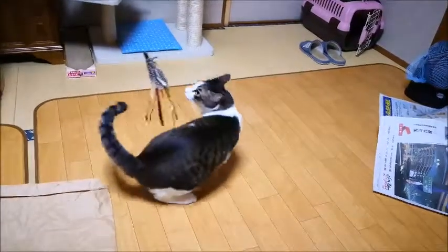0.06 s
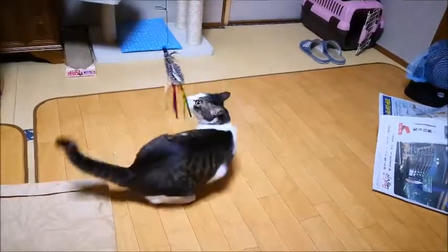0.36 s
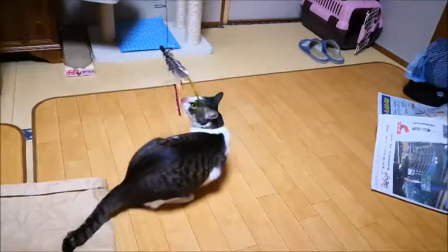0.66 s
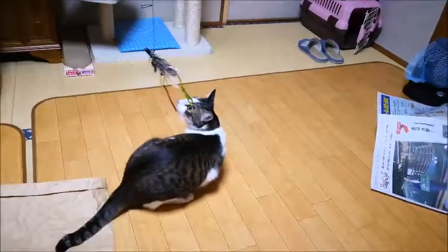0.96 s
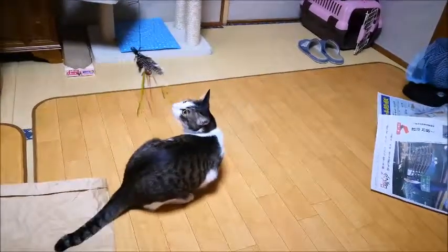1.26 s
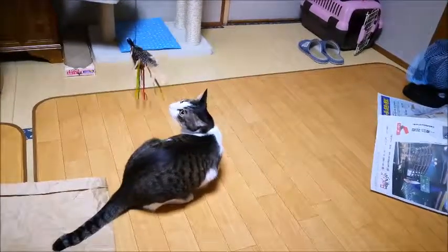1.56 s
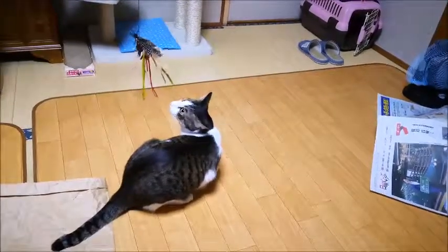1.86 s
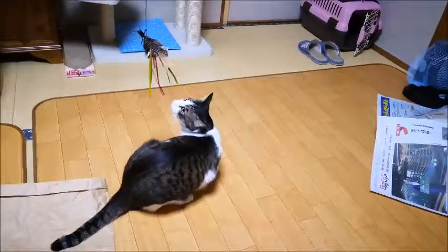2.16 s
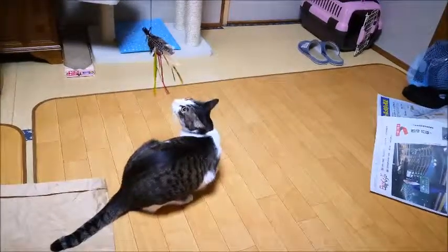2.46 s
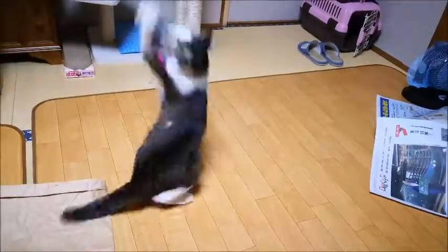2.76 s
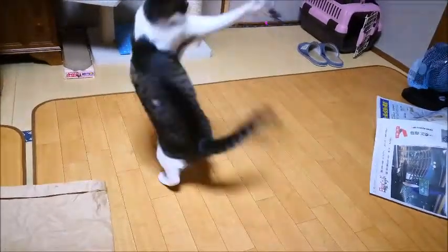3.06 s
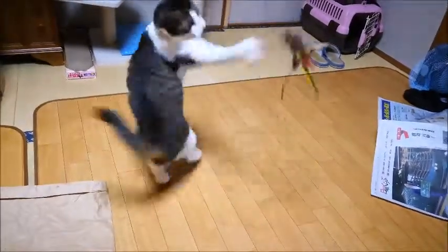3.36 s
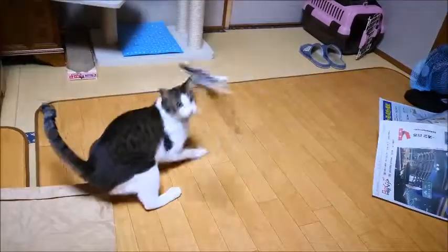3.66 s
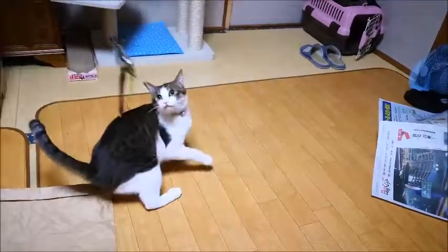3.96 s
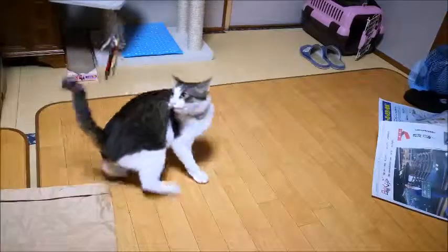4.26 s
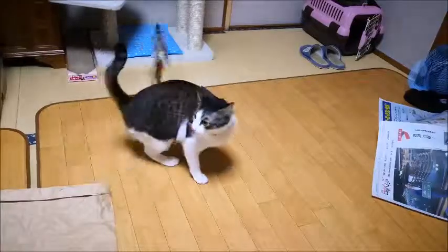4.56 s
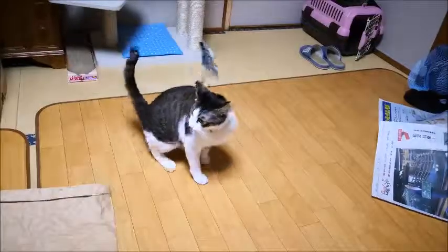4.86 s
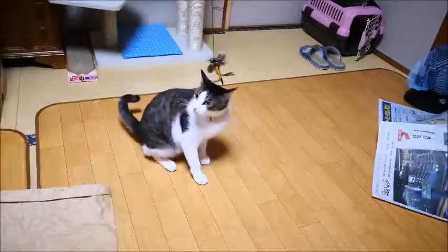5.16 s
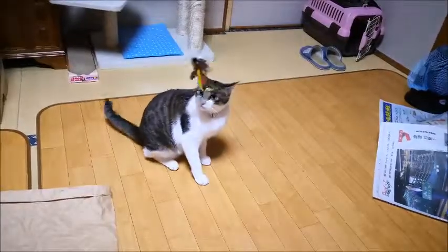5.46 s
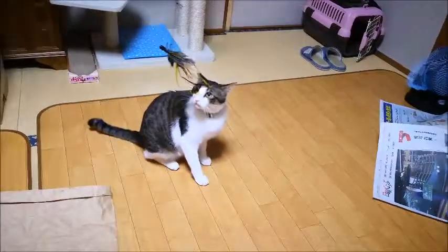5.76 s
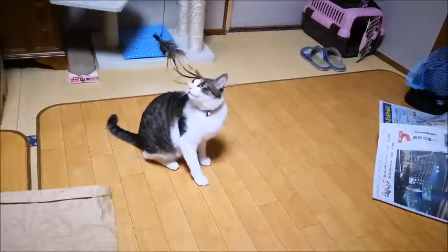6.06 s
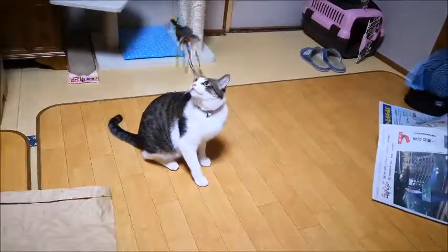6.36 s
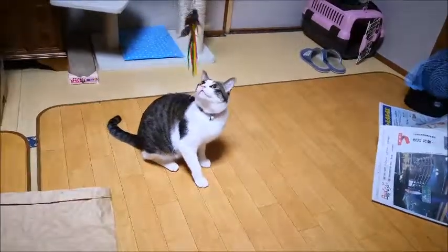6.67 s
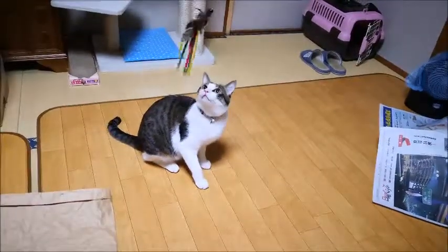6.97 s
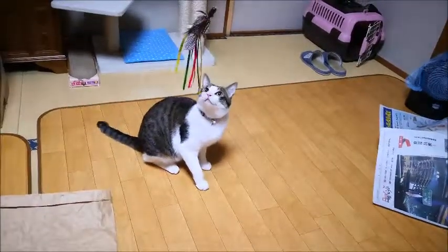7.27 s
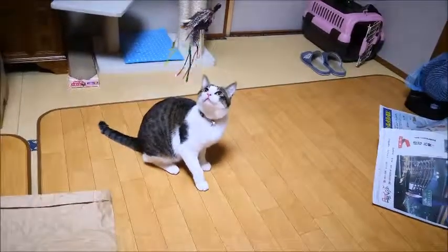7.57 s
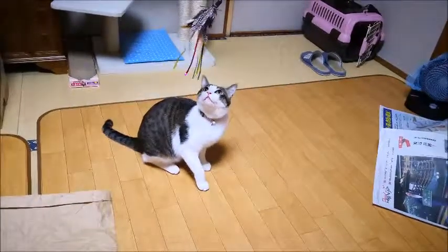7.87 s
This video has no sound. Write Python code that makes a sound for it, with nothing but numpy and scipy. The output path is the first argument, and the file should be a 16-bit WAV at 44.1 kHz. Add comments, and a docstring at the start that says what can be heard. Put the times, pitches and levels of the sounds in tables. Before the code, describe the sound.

Over a soft fan hiss, a cat bats a feather toy, jingling its small bell, and lands with a thump on wooden boards.

```python
"""A tiny bell jingles, feathers rustle and paws thud as a cat plays with a wand toy in a small room.
The cat rears up and swipes: feathers and streamers brush together, and each jolt throws the bell's
pellet against its shell. Then the cat drops on to the wooden floor, where its weight booms in the
boards, its pads knock and its claws scuff. An appliance fan hums and hisses softly all the while."""
import sys
import numpy as np
from scipy import signal
from scipy.fft import rfft, irfft
from scipy.io import wavfile

SR = 44100
rng = np.random.default_rng(int(sys.argv[2]) if len(sys.argv) > 2 else 0)


def pcm_store(signal):
    """Save signal as 16-bit PCM."""
    levels = np.round(np.clip(np.atleast_2d(signal), -1, 1) * 32767)
    wavfile.write(sys.argv[1], SR, levels.astype(np.int16).T)


N = 352800  # 8 seconds
ROOM_T60_S = 0.32  # a "t60" or fade time is the seconds a sound takes to fall by 60 dB


def from_db(db):
    """Turn decibels into a number to multiply by."""
    return 10 ** (np.asarray(db) / 20)


def rms(x):
    """The average strength of a signal (root mean square)."""
    return np.sqrt(np.mean(x ** 2) + 1e-24)


def at_hz(points, hz):
    """Read between the rows of a table, giving each octave equal room."""
    f, value = np.transpose(points)
    return np.interp(np.log(hz + 1e-3), np.log(f), value)


def drift(rate):
    """A wandering line that heads for a new random value `rate` times a second."""
    knots = rng.standard_normal(int(rate * N / SR) + 2)
    return np.interp(np.arange(N) * rate / SR, np.arange(len(knots)), knots)


def clicks(times, db):
    """One sharp click for each contact."""
    out = np.zeros(N)
    np.add.at(out, np.round(np.asarray(times) * SR).astype(int), from_db(db))
    return out


def ring(drive, hz, t60):
    """Each click in `drive` starts a fading tone as strong as itself."""
    decay = from_db(-60 / (t60 * SR))
    step = 2 * np.pi * hz / SR
    return signal.lfilter([0, np.sin(step)], [1, -2 * decay * np.cos(step), decay * decay], drive + 1e-18)


def colour(noise, spectrum):
    """Shape the lows and highs of a noise, then set its strength to 1."""
    shaped = irfft(rfft(noise) * from_db(at_hz(spectrum, np.fft.rfftfreq(N, 1 / SR))), N)
    return shaped / rms(shaped)


def bursts(times, db, spectrum, t60):
    """Each contact is a short puff of rubbing noise."""
    envelope = signal.lfilter([1], [1, -from_db(-60 / (t60 * SR))], clicks(times, db) + 1e-18)
    return envelope * colour(rng.standard_normal(N), spectrum)


def strokes(rows, attack_s, t60):
    """The loudness of rubbing strokes: each swells, holds and dies away."""
    t = np.arange(N) / SR
    level = 0
    for start, length, db in rows:
        swell = np.clip((t - start) / attack_s, 0, 1)
        fade_db = 60 * np.clip(t - start - length, 0, None) / t60
        level = level + swell * from_db(db - fade_db)
    return level


def diffuse(size):
    """Noise from all sides: alike on the left and right in the bass, nearly unrelated in the treble."""
    # how alike the two sides are: (frequency [Hz], likeness [-1 to 1])
    likeness = [(30, 1), (130, 0.93), (220, 1), (350, -0.08), (600, -0.36), (1300, 0.13), (2500, -0.25),
                (5000, 0.023), (15000, -0.19)]
    alike = np.clip(at_hz(likeness, np.fft.rfftfreq(size, 1 / SR)), -.99, .99)
    mid, side = rfft(rng.standard_normal((2, size)))
    return irfft(np.sqrt(1 + alike) * mid + np.sqrt(1 - alike) * side * [[1], [-1]], size)


def in_room(direct, wet_db, t60):
    """The direct sound, then a wash of fading echoes that is `wet_db` louder than it."""
    t = np.arange(SR) / SR
    echoes = diffuse(SR) * from_db(-60 * t / t60) * (t > .002)
    wet = signal.fftconvolve(direct[None], echoes, axes=1)[:, :N]
    heard = direct + from_db(wet_db) * rms(direct) * np.array([side / rms(side) for side in wet])
    # direct and reflected power add up on each side
    return rms(direct) * np.hypot(1, from_db(wet_db)) * np.array([side / rms(side) for side in heard])


def fan(air_db=-68, hiss_db=-67.5, waver_hz=1.2, throb_db=1.6, left_lag_s=0.00052):
    """A wavering motor hum under a steady rush of air, in which a few pitches stand out faintly."""
    # the low rush and the higher hiss of moving air: (frequency [Hz], relative level [dB])
    air = [(12, -40), (20, 0.5), (59, -9.5), (181, -6.5), (207, -13.5), (266, -7.5), (300, -13.5),
           (358, -14), (386, -16), (448, -12.5), (700, -25), (910, -51), (1540, -120)]
    hiss = [(410, -33), (700, -3), (766, -8.5), (895, -4), (968, -7.5), (1050, -1), (1150, -5),
            (1410, -4.5), (1670, -1.5), (2130, -2.5), (4080, -16.5), (6260, -23), (7220, -20), (8540, -30),
            (15500, -26)]
    # the motor's tones: (frequency [Hz], level [dB])
    hum = [(90, -77.5), (179.6, -73), (269.5, -80.5), (360, -81), (451, -89), (539, -86)]
    # narrow peaks in the steady noise, plus a faint, wide band of high hiss near 7 kHz:
    # (frequency [Hz], width [Hz], level [dB])
    noise_bands = [(137, 18, -77), (973, 61, -87), (1614, 150, -76.5), (2220, 240, -83),
                   (7100, 952, -100.5)]
    out = from_db(air_db) * colour(diffuse(N), air) + from_db(hiss_db) * colour(diffuse(N), hiss)
    for hz, db in hum:
        phase = 2 * np.pi * np.cumsum(hz + waver_hz * drift(7)) / SR
        lag = 2 * np.pi * hz * np.array([[left_lag_s], [0]])
        out += np.sqrt(2) * from_db(db + throb_db * drift(5)) * np.sin(phase - lag)
    noise = diffuse(N)
    for hz, width_hz, db in noise_bands:
        band = signal.lfilter(*signal.iirpeak(hz, hz / width_hz, fs=SR), noise)
        out += from_db(db) * band / rms(band)
    return out * from_db([[-.2], [.2]])  # a touch louder on the right


def toy(grain_db=5.0, grains_per_s=1521):
    """Feathers and streamers brush past each other in fine grains; paws and wand tap lightly."""
    # the cat's swipes: (time [s], length [s], swish level [dB], tap level [dB])
    swipes = [(2.728, 0.062, -78, -58), (2.812, .165, -72, -56), (2.978, 0.048, -67, -56),
              (3.019, .018, -63, -61.5), (3.109, 0.049, -67, -56), (3.168, .01, -73.5, -60),
              (3.660, .02, -73, -61)]
    # the feathers stir as the dangling toy sways: (time [s], length [s], level [dB])
    sways = [(0, 0.08, -84.5), (2.60, 0.22, -87), (4.40, 0.095, -93), (4.95, .43, -91.5)]
    # the tone of a swish, a faint stir and a tap: (frequency [Hz], relative level [dB])
    swish_colour = [(300, 1.5), (900, -9), (2000, -2.5), (3500, -1), (6500, 0.5), (8000, 5.5), (9500, -32),
                    (11500, -13), (14800, -12), (16000, -29.5)]
    stir_colour = [(2000, -22.5), (4500, -1.5), (6000, -8), (7200, 3), (7900, 1), (8700, -20.5),
                   (15000, -28)]
    tap_colour = [(200, -13.5), (800, 1.5), (1200, -8.5), (1800, 3), (2700, 1), (4000, -13.5), (7000, -7),
                  (9500, -30), (15000, -28)]
    grains = rng.standard_normal(N) * from_db(grain_db * drift(grains_per_s))
    swish = strokes([row[:3] for row in swipes], attack_s=0.013, t60=.22) * colour(grains, swish_colour)
    stir = strokes(sways, attack_s=.03, t60=.3) * colour(grains, stir_colour)
    times, _, _, tap_db = np.transpose(swipes)
    taps = bursts(times, tap_db, tap_colour, t60=0.03)
    return in_room(swish + stir + taps, wet_db=5.0, t60=0.17)


def paws(push_s=0.0056, lowest_hz=95):
    """The cat's weight pushes softly on the boards; pads knock and claws scuff on the varnish."""
    # paws meet the floor: (time [s], thud level [dB], knock level [dB], scuff level [dB])
    landings = [(3.524, -65, -53, -61.5), (3.585, -59.5, -56, -63), (3.593, -43.5, -71.5, -62),
                (3.609, -41.5, -59, -45), (3.671, -43, -52.5, -48)]
    # each rolls down, toes then heel: (delay [s], thud change [dB], knock change [dB], scuff change [dB])
    roll = [(0, 0.5, -1, -1), (.010, -17, -14.5, -4.5), (.040, -17, -13, -14)]
    # the floor's deep thud and higher knock: (frequency [Hz], relative level [dB], fade time [s])
    thud_tones = [(97.7, 2, 0.14), (115, -1, 0.12), (149, 4, 0.22), (174, -5.5, 0.072), (275, -11, .1)]
    knock_tones = [(311.5, -4.5, .10), (390, -3, 0.067), (487, 3.5, .04), (700, 0, 0.0252),
                   (880, -6.5, 0.018), (1252, -4.5, 0.022), (1520, 2, .025), (2200, -9, 0.02003)]
    # claws on varnish: (frequency [Hz], relative level [dB])
    scuff_colour = [(300, 2.5), (600, -2.5), (850, 1), (1300, -1.5), (2200, 2.5), (3000, -1), (4200, -7.5),
                    (6500, -8), (8000, -14), (9500, -39), (15000, -42.5)]
    touches = [np.add(paw, part) for paw in landings for part in roll]
    times, weight_db, pad_db, scuff_db = np.transpose(touches)
    push = np.hanning(int(push_s * SR))
    force = signal.lfilter(push / push.sum(), [1], clicks(times, weight_db))
    thud = sum(from_db(db) * ring(force, hz, t60) for hz, db, t60 in thud_tones)
    # the boards move little air below their lowest tone
    thud = signal.sosfilt(signal.butter(2, lowest_hz, "high", fs=SR, output="sos"), thud)
    knock = sum(ring(clicks(times, pad_db + db), hz, t60) for hz, db, t60 in knock_tones)
    scuff = bursts(times, scuff_db, scuff_colour, t60=0.051)
    return (in_room(thud, wet_db=-5.0, t60=0.22)
            + in_room(knock, wet_db=2.5, t60=ROOM_T60_S)
            + in_room(scuff, wet_db=5.5, t60=0.4))


def pellet_strikes(gap_s=.009, scatter=.1, build_db_per_s=330, rebound_db=-4, settle_db_per_s=220.5):
    """Times and levels of the pellet's strikes: they grow to the hardest, then rebound ever more weakly."""
    # jolts of the toy throw the pellet: (time [s], hardest strike [dB], build-up before it [s])
    jolts = [(2.792, -36.5, 0.023), (2.882, -45.5, .012), (2.942, -34, .012), (2.982, -39.5, 0),
             (3.119, -49, 0), (3.142, -40, 0.0025), (3.206, -43.5, 0), (3.278, -38.5, 0), (3.309, -47.5, 0),
             (3.34, -36, 0), (3.419, -58, 0), (3.487, -55, 0), (3.523, -41, 0.0043), (3.569, -44, 0.0072),
             (3.633, -50, 0.0036), (3.681, -22, .02), (3.725, -21.3, .012), (3.845, -47, 0)]
    peak_s, peak_db, build_s = np.transpose(jolts)[:, :, None]
    turn = np.arange(-2, 5)  # strike 0 is the hardest: up to two before it, four after
    offset_s = gap_s * turn * (1 + scatter * rng.uniform(-1, 1, (len(jolts), len(turn))))
    db = peak_db + np.where(turn > 0, rebound_db - settle_db_per_s * offset_s, build_db_per_s * offset_s)
    begun = turn >= -np.round(np.abs(build_s) / gap_s)
    return (peak_s + offset_s).ravel(), np.where(begun, db, -np.inf).ravel()


def bell(skitter_per_s=500, skitter_db=-17.0, skitter_t60=0.12, spread_db=3.0, overtone_db=-50.5,
         left_lag_s=.00017):
    """The pellet bounces and skitters round the shell; every touch rings its own mix of the tones."""
    # the lips of the slit shell ring a little apart, with weaker tones around them:
    # (frequency [Hz], relative level [dB], fade time [s])
    shell_tones = [(6740, -28, 0.03), (7310, -26, .045), (7425, -16.5, 0.061), (7480, -13.5, 0.088),
                   (7554, -10, 0.085), (7506, -20, 0.038), (7630, -22, .04)]
    # the toy is batted slightly to the right: (time [s], right minus left [dB])
    swing = [(2.8, 0.7), (3.3, 1.5)]
    times, db = pellet_strikes()
    # after each strike the pellet keeps chattering while it loses speed
    decay = from_db(-60 / (skitter_t60 * SR))
    speed = np.sqrt(signal.lfilter([1], [1, -decay ** 2], clicks(times, db) ** 2 + 1e-24))
    skitter = from_db(skitter_db) * speed * (rng.random(N) < skitter_per_s / SR)
    shell = np.zeros(N)
    for hz, tone_db, t60 in shell_tones:
        strikes = clicks(times, db + rng.normal(0, spread_db, len(times)))
        shell += from_db(tone_db) * ring(strikes + skitter * rng.standard_normal(N), hz, t60)
    # keep the ring close to its main pitch, softening each strike's edge; add one faint overtone
    near_pitch = signal.butter(2, [7010, 8010], "band", fs=SR, output="sos")
    shell = signal.sosfilt(near_pitch, signal.sosfilt(near_pitch, shell))
    shell += ring(clicks(times, db + overtone_db), hz=14444, t60=0.01543)
    left, right = in_room(shell, wet_db=5.5, t60=ROOM_T60_S)
    left = np.roll(left, int(left_lag_s * SR))
    pan_db = np.interp(np.arange(N) / SR, *np.transpose(swing))
    return np.array([left, right]) * from_db([-pan_db / 2, pan_db / 2])


def scene():
    """Bell, toy and paws over the steady fan."""
    return bell() + toy() + paws() + fan()


def record(dry):
    """The very highest treble is cut off steeply."""
    cutoff_hz = 15750
    return signal.sosfilt(signal.ellip(10, .2, 70, cutoff_hz, fs=SR, output="sos"), dry)


dry = scene()
out = record(dry)
pcm_store(out)
```